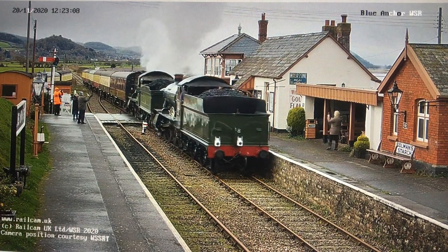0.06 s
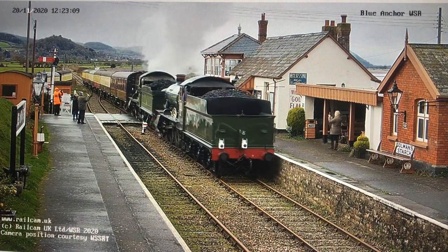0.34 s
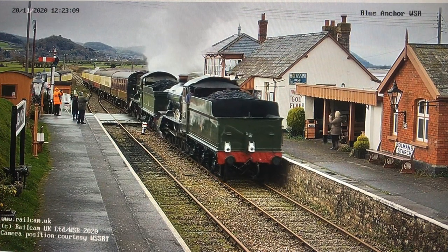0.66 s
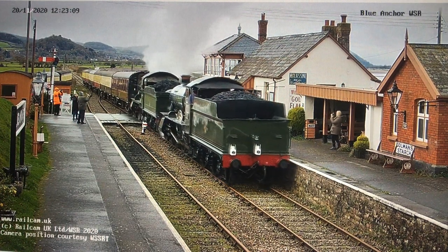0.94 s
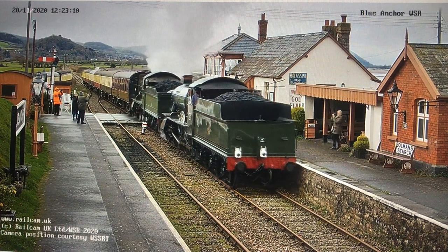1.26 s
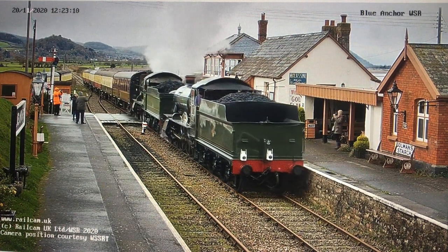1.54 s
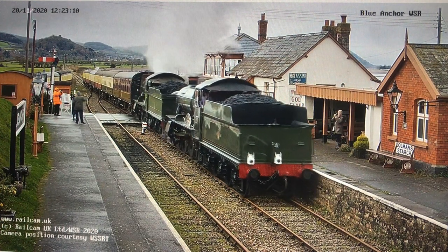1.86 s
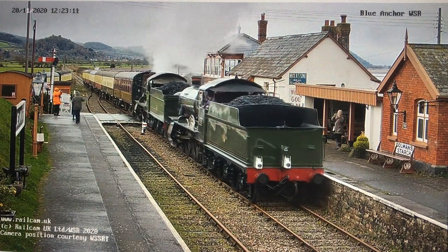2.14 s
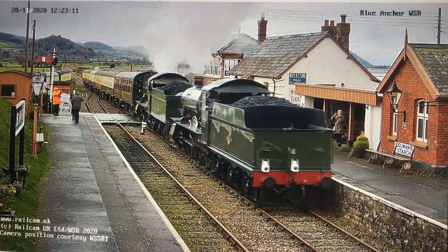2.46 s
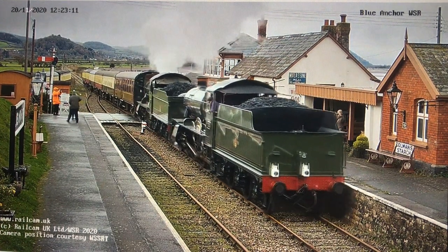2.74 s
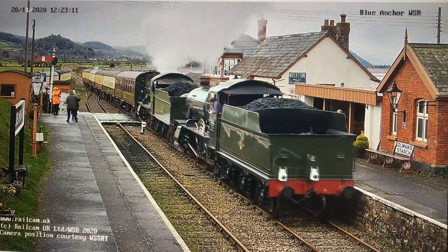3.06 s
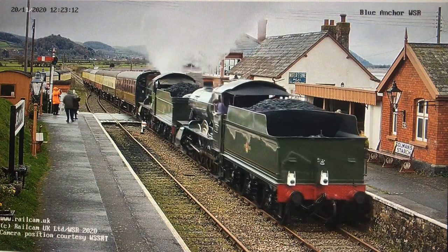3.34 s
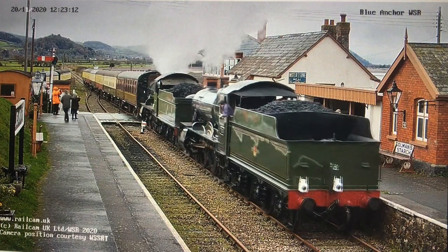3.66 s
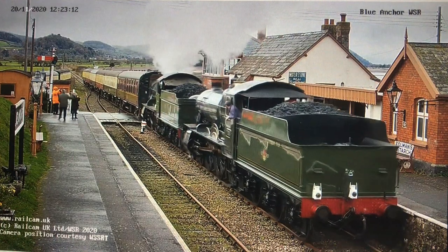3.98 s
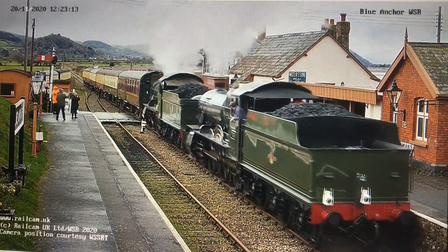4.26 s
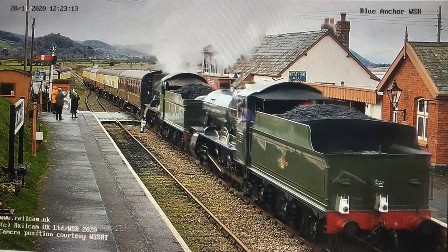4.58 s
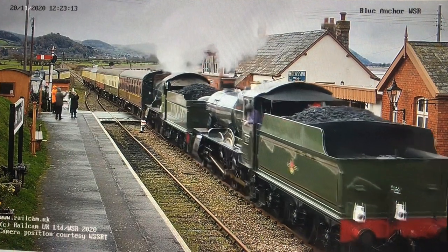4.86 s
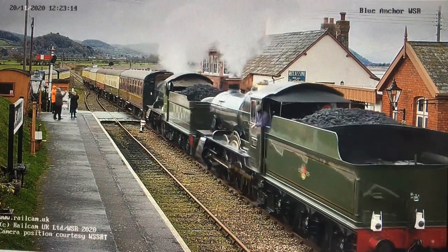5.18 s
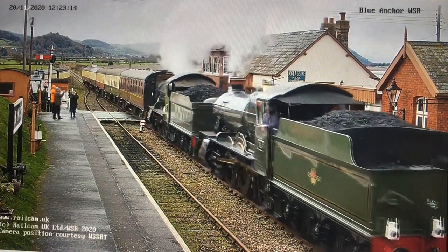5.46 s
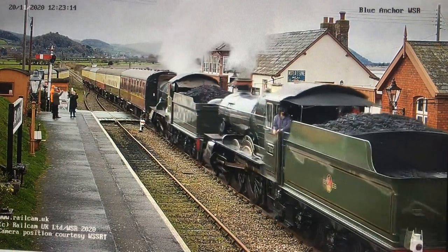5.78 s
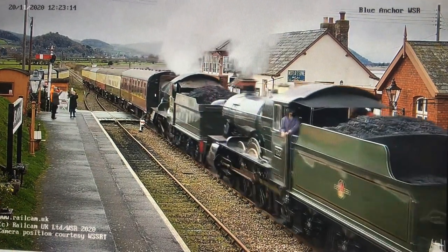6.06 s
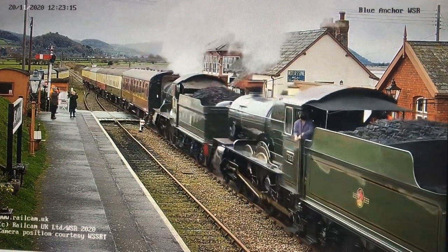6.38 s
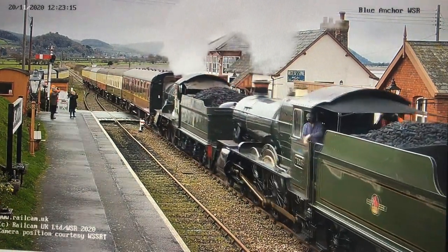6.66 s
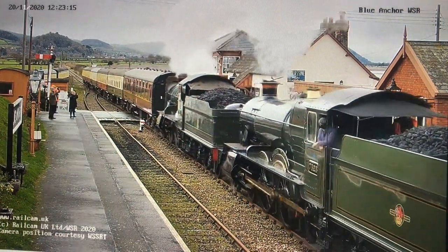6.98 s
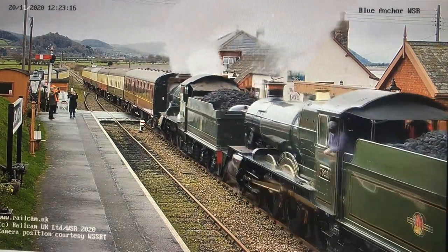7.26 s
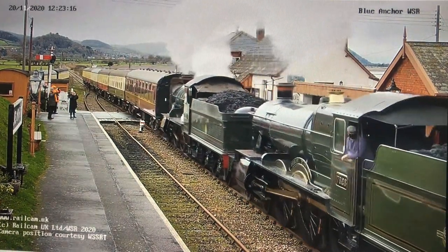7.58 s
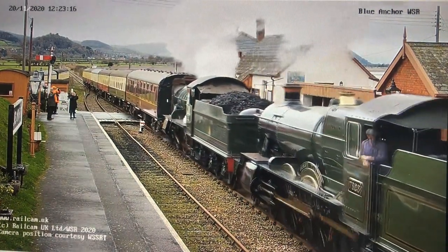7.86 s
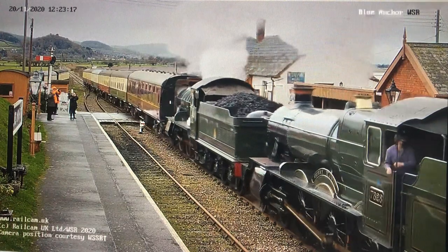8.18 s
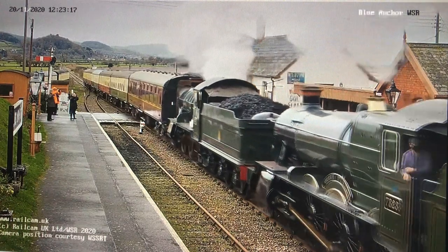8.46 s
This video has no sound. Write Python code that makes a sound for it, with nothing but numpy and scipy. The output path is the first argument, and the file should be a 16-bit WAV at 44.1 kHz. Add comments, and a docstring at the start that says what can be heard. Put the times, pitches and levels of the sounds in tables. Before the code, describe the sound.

Two steam locomotives draw a train slowly into a country station. From the start their exhaust chuffs evenly, about twice a second, echoing briefly off the buildings and becoming shorter, harder and boomier as they near. Faint steam escapes with each beat, and a valve sniffs softly about once a second. Wheels rumble with small rattles, growing gradually louder. Single iron knocks come at about 2.7 and 3.7 seconds, and two soft, dull pops at about 2.4 and 4.9 seconds. From 6.8 to 8.3 seconds rods and couplings clank repeatedly at close range, with two faint steam spurts. Around 8 seconds the leading wheels swell past and rubbing metal gives one very short, rough, sagging groan. The microphone is fixed near the track inside a housing, which makes chuffs, wheels and clanks boxy and nasal. A low hum, soft rumble and faint hiss continue underneath throughout.

```python
"""A country station, close to the track; the microphone sits in the housing of a fixed camera.
Two steam locomotives haul a train slowly in from a distance. Their exhaust blasts up the chimney about
twice a second and echoes off the buildings; steam spurts and a valve sniffs. Wheels rumble, rods clank
and metal groans once as the engines come alongside. The housing makes exhaust, wheels and clanks boxy
and nasal; underneath lie a low hum, a soft rumble, a faint hiss and two soft pops."""
import sys
import numpy as np
from scipy import signal
from scipy.fft import rfft, irfft, next_fast_len
from scipy.io import wavfile

SR = 44100
rng = np.random.default_rng(int(sys.argv[2]) if len(sys.argv) > 2 else 0)


def digitize_waveform(pressure):
    """Quantize a signal to 16-bit integers and store it at the path in sys.argv[1].

    Rows of a 2-D input are taken as channels; values are limited to [-1, 1].
    """
    field = np.atleast_2d(pressure).T
    bounded = np.clip(field, -1, 1)
    quanta = np.round(bounded * 32767).astype(np.int16)
    wavfile.write(sys.argv[1], SR, quanta)


N = 380583
TIME = np.arange(N) / SR

# the housing round the microphone passes two broad humps: f/Hz, level/dB
HOUSING_HUMPS = [(30, -47.5), (120, -39), (190, -14.5), (450, -16), (540, -4.5), (800, -2), (900, -14),
                 (1300, -33), (2480, -41), (2770, -17), (3250, -26), (3620, -34), (3920, -54), (9000, -84)]
# its narrow cavity peaks and dips: f/Hz, width/Hz, level/dB
HOUSING_CAVITY = [(191, 9.3, 2), (293.2, 18, -11), (350.5, 56, 4), (414, 40, 2.5), (497.6, 17.6, -13.5),
                  (519.5, 16, 2), (773, 22, 3.5), (885, 19, -6.5), (931, 21, 3), (1032.4, 28, -7),
                  (1051, 23, 4), (1111, 20, -6), (1184, 35, -9.5), (1210, 32, 5.5), (1860, 73, 3),
                  (2330, 14, 10), (2384, 50, 6.5), (2820, 28, 5), (2842, 59, -2.5), (2908, 59, 4.5),
                  (3344, 62, -15.5)]
# spectra of the sources, shape only: f/Hz, level/dB
RUMBLE_COLOUR = [(15, -45.5), (30, -16), (42, -1.5), (51, 5.5), (60, -1), (80, 0), (110, -12), (140, -0.5),
                 (220, -24), (600, -70)]
HISS_COLOUR = [(3000, -8.5), (4000, -7.5), (4480, 15), (4950, 6.5), (5170, 11), (5290, 19), (5580, 17),
               (5700, 9.5), (6600, 2.5), (8000, 1), (10500, -3), (12000, 0), (14800, -1), (15600, -1)]
WHEEL_COLOUR = [(120, -9.5), (250, 3.5), (400, 9.5), (560, 5.5), (780, 1), (1050, 4.5), (1500, 5.5),
                (2200, 11), (2800, 11.5), (3600, 16)]
TRACK_COLOUR = [(50, 3.5), (190, 2), (260, 1), (380, -7.5), (600, -27.5), (1200, -44.5)]
EXHAUST_COLOUR = [(100, -6), (200, -6), (350, 1.5), (480, 0), (775, 1.5), (1500, 0), (2800, 0.5), (3300, 2),
                  (3700, 2), (4100, -11.5)]
LEAK_COLOUR = [(2500, -35), (4200, -6.5), (5600, 4), (7000, -7.5), (8500, -11.5), (12000, -24.5),
               (16000, -24)]
SNIFF_COLOUR = [(3600, -36.5), (4300, -2.5), (4550, 1), (5000, -12), (5600, -6.5), (7000, -23.5),
                (12000, -42)]
DULL_IRON_COLOUR = [(100, -5.5), (400, 9), (600, 7.5), (800, 2.5), (1600, -9), (2800, -1), (4000, 4.5)]
HARD_IRON_COLOUR = [(600, -26.5), (1100, -5.5), (1400, 0), (1850, -3.5), (2400, 5.5), (2750, -22),
                    (4000, -22.5)]
# exhaust beats: t/s at full blast, relative level/dB, rasp/dB, hollow resonance f/Hz
BEATS = [(0.14, -24.5, 2, 770), (0.573, -26, 0, 705), (1.031, -26, -2.5, 710), (1.503, -24.5, -.5, 740),
         (1.953, -26, 2, 704), (2.385, -28, 2.5, 715), (2.846, -26, -1, 680), (3.317, -27, 2.5, 840),
         (3.766, -26, 1.3, 794), (4.198, -28, 4, 667), (4.649, -28.5, 6, 670), (5.122, -27, 2.5, 777),
         (5.576, -28.5, 3.5, 695), (6.002, -27.5, 4, 663), (6.463, -26.5, 3.5, 647),
         (6.937, -25.5, 3.5, 700), (7.386, -27, 4.5, 680), (7.829, -26, 5.3, 710), (8.273, -26.5, 3.5, 655)]
# lone spurts of leaking steam: t/s, level/dB, decay/s
SPURTS = [(6.82, -73, .05), (8.072, -66, .18)]
# the station's echo: f/Hz, t/s to fall by 60 dB
STATION_T60 = [(150, 0.85), (700, 0.41), (3000, 0.58), (8000, 0.1)]
# soft pops: t/s, level/dB, starting f/Hz, final f/Hz, fall/s, decay/s, tick level/dB
SOFT_POPS = [(2.432, -33.5, 198, 48, 0.0072, .007, -58), (4.8768, -30, 620, 60, 0.0032, 0.0044, -42)]
# blows of rods, couplings and wheels: t/s, level/dB, decay/s, hard ring/dB relative to the blow
IRON_BLOWS = [(2.703, -34, 0.011, -19), (3.65, -30, 0.014, -29), (6.789, -27, 0.035, -39),
              (7.036, -30.5, 0.029, -37), (7.139, -34, 0.02, -12.5), (7.491, -27, .0096, -38),
              (7.736, -29, 0.031, -29), (7.783, -26.5, 0.018, -31), (7.916, -28.5, .04, -14.5),
              (8.085, -25, .012, -35), (8.104, -32, 0.0032, -1.5), (8.206, -25.5, 0.0066, -32),
              (8.298, -30, 0.025, -6.5)]

PASS_S, PASS_HALF_WIDTH_S = 7.84, .4  # the leading wheels pass the microphone
# the beats get shorter, harder and boomier as the engines near: (far off, close by)
CLOSING_S, BITE_DB, BOOM_DB = (.042, .026), (-1, 2.5), (-22, -16)


def gain_of(db):
    """Decibels to amplitude."""
    return 10 ** (np.asarray(db) / 20)


def unit_rms(x):
    """Scales to rms 1."""
    return x / np.sqrt(np.mean(x ** 2) + 1e-20)


def curve_at(points, hz):
    """Reads a curve on a log-frequency axis."""
    f, value = np.transpose(points)
    return np.interp(np.log(hz + 1), np.log(f), value)


def housing_db(hz):
    """What reaches the microphone inside the housing: broad humps, narrow cavity peaks and dips."""
    cavity = sum(db * np.exp2(-(2 * (hz - f) / width) ** 2) for f, width, db in HOUSING_CAVITY)
    return curve_at(HOUSING_HUMPS, hz) + cavity


def coloured(x, colour, housed=True, size=8192):
    """Causal filter of unit energy: the source's colour and, if housed, that of the housing."""
    hz = abs(np.fft.fftfreq(size, 1 / SR))
    log_gain = np.log(gain_of(curve_at(colour, hz) + (housing_db(hz) if housed else 0)))
    minimum_phase = np.exp(np.conj(signal.hilbert(log_gain)))
    ring = np.fft.ifft(minimum_phase).real[:size // 2]
    return signal.oaconvolve(x, ring / np.linalg.norm(ring))[:N]


def wander(rate_hz):
    """Smooth random motion of rms 1."""
    size = next_fast_len(N)
    hz = np.fft.rfftfreq(size, 1 / SR)
    spectrum = rfft(rng.standard_normal(size)) * np.exp(-(hz / rate_hz) ** 2)
    return unit_rms(irfft(spectrum, size)[:N])


def turbulence(rate_hz, depth_db):
    """Noise that comes in small random gusts."""
    return unit_rms(rng.standard_normal(N) * gain_of(depth_db * wander(rate_hz)))


def treble(x, edge_hz=2200):
    """The part of a sound above the edge, where the housing's upper hump lies."""
    size = next_fast_len(N)
    hz = np.fft.rfftfreq(size, 1 / SR)
    return irfft(rfft(x, size) * hz ** 8 / (hz ** 8 + edge_hz ** 8), size)[:N]


def resonate(x, hz, width_hz):
    """One resonance of gain 1."""
    return signal.lfilter(*signal.iirpeak(hz, hz / width_hz, SR), x)


def bursts(rows, rise_s):
    """Envelope of events (t/s, level/dB, decay/s) that rise quickly and die away."""
    power = np.zeros(N)
    for s, db, decay in rows:
        start = round(s * SR)
        t = TIME[:N - start][:SR]
        power[start:start + SR] += (gain_of(db) * (1 - np.exp(-t / rise_s)) * np.exp(-t / decay)) ** 2
    return np.sqrt(power)


def approach(far_and_near, s):
    """Moves a setting from its distant value to its close one as the engines draw up."""
    return np.interp(s, (0, PASS_S), far_and_near)


def closeness(s):
    """Inverse distance from the leading wheels to the microphone: 1 as they pass."""
    return 1 / np.hypot(1, (s - PASS_S) / PASS_HALF_WIDTH_S)


def background(hum_hz=90.16):
    """The bed under the train: a steady low hum, a soft rumble and a slightly grainy hiss."""
    hum = gain_of(-52) * np.sqrt(2) * np.sin(2 * np.pi * (hum_hz * TIME + rng.random()))
    rumble = gain_of(-60) * coloured(rng.standard_normal(N), RUMBLE_COLOUR, housed=False)
    hiss = gain_of(-71) * coloured(turbulence(1500, depth_db=1.5), HISS_COLOUR, housed=False)
    return hum + rumble + hiss


def rolling(bright_db, rattles_per_s=45):
    """Gusty noise of wheels on rails, with small rattles."""
    rattles = (rng.random(N) < rattles_per_s / SR) * np.sign(rng.standard_normal(N))
    roll = turbulence(18, depth_db=1.23)
    return roll + gain_of(-13.5) * unit_rms(rattles) + (gain_of(bright_db) - 1) * treble(roll)


def wheels(rise_db_per_s=.3768):
    """The train rolls steadily closer; the leading wheels swell past and the track's drone lifts."""
    train = gain_of(-48 + rise_db_per_s * TIME) * rolling(bright_db=.63)
    leading = gain_of(-38.5) * closeness(TIME) * rolling(bright_db=-5)
    drone = rng.standard_normal(N) * gain_of(-52.5 + 3.9 * closeness(TIME))
    return coloured(train + leading, WHEEL_COLOUR) + coloured(drone, TRACK_COLOUR)


def steam_jet(eddy_share=.43, eddies_per_s=240):
    """Rushing steam, from which large eddies break off as irregular sharp puffs."""
    eddy_count = np.cumsum(eddies_per_s * np.exp(.45 * wander(200))) / SR
    eddies = np.diff(np.floor(eddy_count), prepend=0) * np.sign(rng.standard_normal(N))
    rush = turbulence(120, depth_db=1.13)
    return np.sqrt(1 - eddy_share) * rush + np.sqrt(eddy_share) * unit_rms(eddies)


def chimney(drive, hz=191.2, width_hz=10):
    """The air column of the chimney booms briefly under each blast."""
    t = TIME[:SR]
    column = np.exp(-np.pi * width_hz * t) * np.sin(2 * np.pi * hz * t)
    return signal.oaconvolve(drive, column / np.linalg.norm(column))[:N]


def exhaust(opening_s=.048, hold_s=.027, rasp_fade_db_per_s=55):
    """Each valve opening lets a blast up the chimney; it holds, then dies as the cylinder empties."""
    steam = steam_jet()
    rasp = treble(steam)
    bite = resonate(steam, 1150, width_hz=300)  # the hard middle of the blast
    blast, boom = np.zeros((2, N))
    for s, db, rasp_db, hollow_hz in BEATS:
        span = slice(max(round((s - .1) * SR), 0), round((s + .5) * SR))
        t = TIME[span] - s
        swell = np.clip(1 + t / opening_s, 0, 1) ** 1.92  # the steam port uncovers faster and faster
        valve = gain_of(db) * swell * np.exp(-np.maximum(t - hold_s, 0) / approach(CLOSING_S, s))
        # raspiest while the pressure is high
        rasp_gain = gain_of(rasp_db - rasp_fade_db_per_s * np.clip(t - hold_s / 2, -hold_s, hold_s))
        bite_gain = gain_of(approach(BITE_DB, s))
        puff = valve * (steam[span] + (rasp_gain - 1) * rasp[span] + (bite_gain - 1) * bite[span])
        blast[span] += puff + .24 * resonate(puff, hollow_hz, width_hz=90)
        boom[span] += puff * gain_of(approach(BOOM_DB, s))
    return gain_of(-1.4) * coloured(blast, EXHAUST_COLOUR) + chimney(boom)


def steam_leaks(lag_s=.003, puff_db=(-72, -71), decay_s=.045):
    """A little steam escapes with every beat, and in two lone spurts at close range."""
    puffs = [(s + lag_s, approach(puff_db, s), decay_s) for s, *_ in BEATS]
    envelope = bursts(SPURTS + puffs, rise_s=.012)
    return coloured(envelope * rng.standard_normal(N), LEAK_COLOUR, housed=False)


def station_echo(x, delay_s=.022, echoes_per_s=2000):
    """Walls and platforms scatter the sound back to the microphone; the top treble dies first."""
    taps = rng.choice([-1., 1.], SR) * (rng.random(SR) < echoes_per_s / SR) * (TIME[:SR] > delay_s)
    hz, t, spectra = signal.stft(taps, SR, nperseg=256)
    decay = gain_of(-60 * t / curve_at(STATION_T60, hz)[:, None])
    tail = signal.istft(spectra * decay, SR, nperseg=256)[1]
    return signal.oaconvolve(x, tail / np.linalg.norm(tail))[:N]


def valve_sniffs(first_s=.41, turn_s=1.002, back_lag_s=.42, decay_s=.06):
    """A valve sniffs once each turn of the wheels, and more faintly in between."""
    main = [(s, -67, decay_s) for s in np.arange(first_s, TIME[-1], turn_s)]
    back = [(s, -72.5, decay_s) for s in np.arange(first_s + back_lag_s, TIME[-1], turn_s)]
    envelope = bursts(main + back, rise_s=.0079)
    return coloured(envelope * rng.standard_normal(N), SNIFF_COLOUR, housed=False)


def pops(tick_hz=900, tick_s=.00038):
    """Short dull pops that fall in pitch: a tiny tick first, the bass last."""
    out = np.zeros(N)
    for s, db, start_hz, end_hz, fall, decay, tick_db in SOFT_POPS:
        t = np.maximum(TIME - s, 0)
        turns = end_hz * t + (start_hz - end_hz) * fall * (1 - np.exp(-t / fall))
        out += gain_of(db) * t / decay * np.exp(1 - t / decay) * np.sin(2 * np.pi * turns)
        out += gain_of(tick_db) * t / tick_s * np.exp(1 - t / tick_s) * np.sin(2 * np.pi * tick_hz * t)
    return out


def knocks(per_s=10, passing_db=-36.5, spread_db=2, decay_s=.017, ring_db=-17):
    """Rows of lesser blows: the running gear knocks at random, louder near the microphone."""
    times = TIME[rng.random(N) < per_s / SR]
    distance_db = .86 * 20 * np.log10(closeness(times))
    levels = passing_db + distance_db + spread_db * rng.standard_normal(len(times))
    return [(s, db, decay_s, ring_db) for s, db in zip(times, levels)]


def clanks():
    """Slack iron parts chatter briefly as they take up load; hard contacts add a higher ring."""
    chatter = turbulence(250, depth_db=1.1)
    blows = IRON_BLOWS + knocks()
    dull = bursts([(s, db, decay) for s, db, decay, _ in blows], rise_s=.00057)
    hard = bursts([(s, db + ring_db, decay) for s, db, decay, ring_db in blows], rise_s=.00077)
    return coloured(dull * chatter, DULL_IRON_COLOUR) + coloured(hard * chatter, HARD_IRON_COLOUR)


def groan(start_s=7.955, length_s=.093, start_hz=725, sag_hz_per_s=600):
    """Close by, rubbing metal holds one rough note that swells, sags and fades."""
    t = np.clip(TIME - start_s, 0, length_s)
    hz = (start_hz - sag_hz_per_s * t) * (1 + .012 * wander(97))
    turns = np.cumsum(hz) / SR
    level = np.sin(np.pi * t / length_s) * gain_of(-30 + 1.4 * wander(80))
    return level * np.sqrt(2) * np.sin(2 * np.pi * turns)


def scene():
    """At the microphone, in mono: the train, its echo in the station, the background and the pops."""
    beats = exhaust()
    gear = clanks() + groan()
    echo = station_echo(gain_of(-15) * beats + gain_of(-18.5) * gear)
    train = beats + gear + echo + wheels() + steam_leaks() + valve_sniffs()
    return (train + background() + pops())[None]


def record(dry, ceiling_db=-8.5, edge_hz=15800):
    """The loudest peaks are gently rounded, then the highest treble is cut off."""
    ceiling = gain_of(ceiling_db)
    rounded = ceiling * np.tanh(dry / ceiling)
    lowpass = signal.firwin(511, edge_hz, window=("kaiser", 9), fs=SR)
    return signal.oaconvolve(rounded, lowpass[None], "same")


dry = scene()
out = record(dry)
digitize_waveform(out)
```